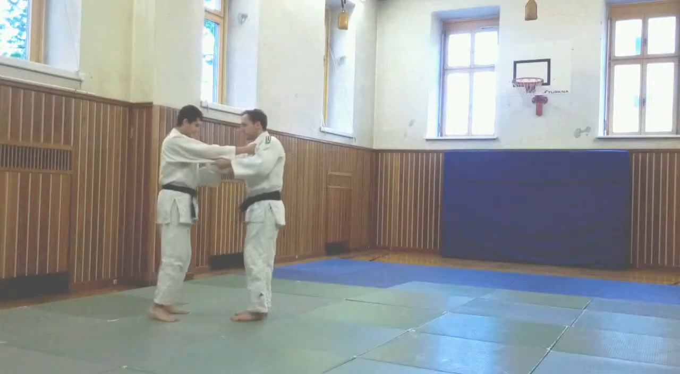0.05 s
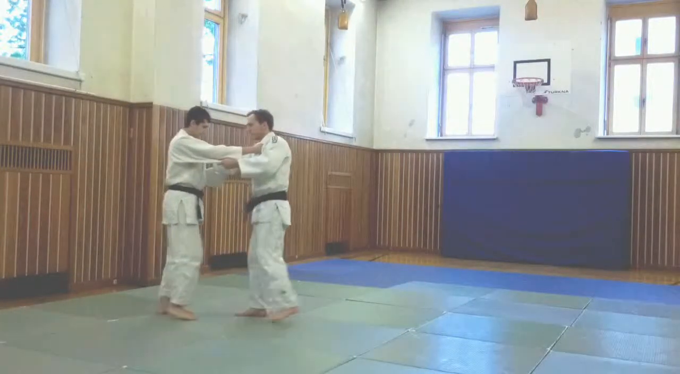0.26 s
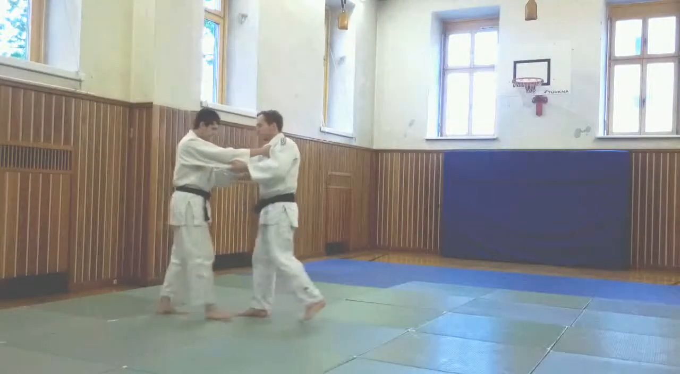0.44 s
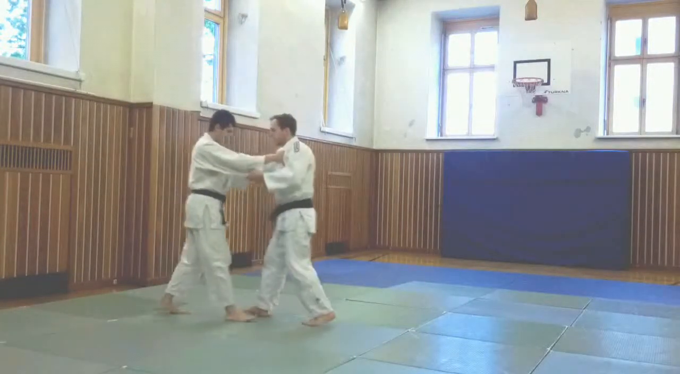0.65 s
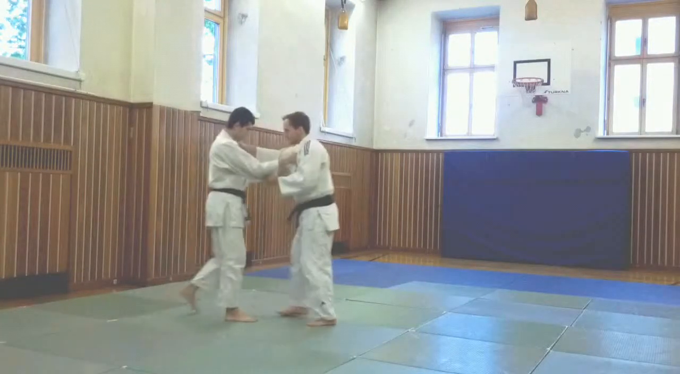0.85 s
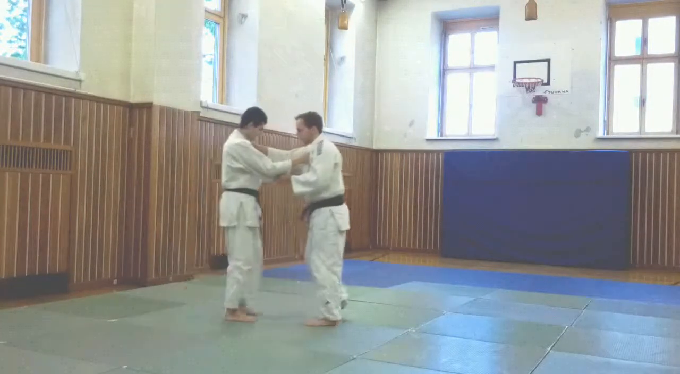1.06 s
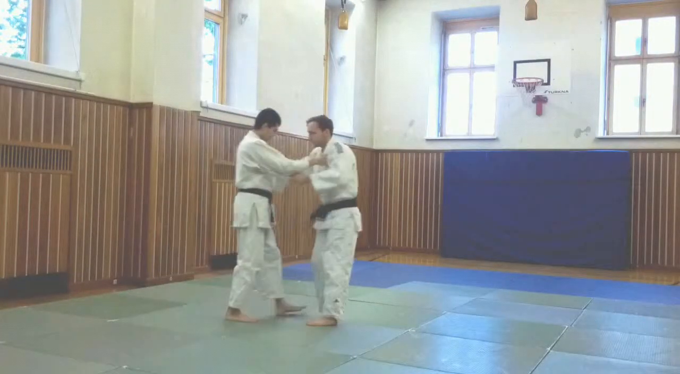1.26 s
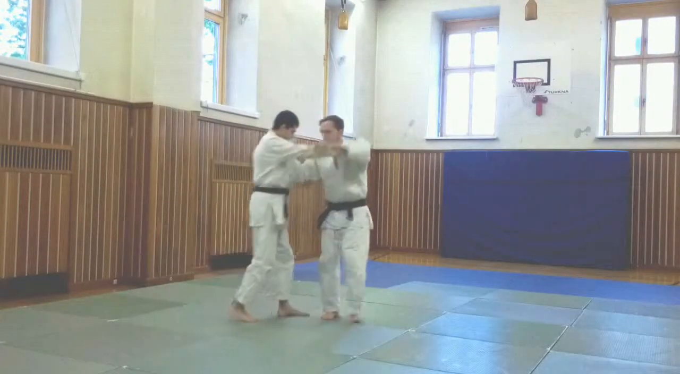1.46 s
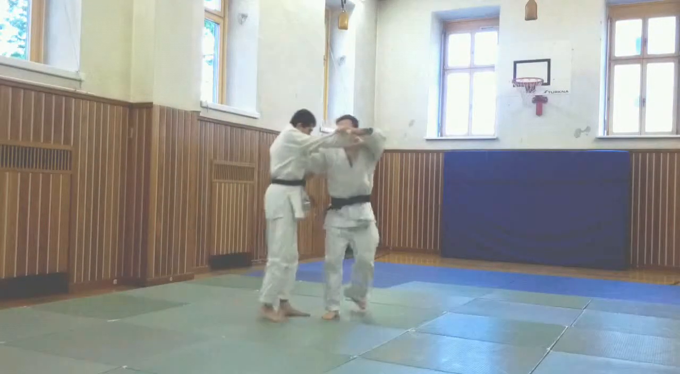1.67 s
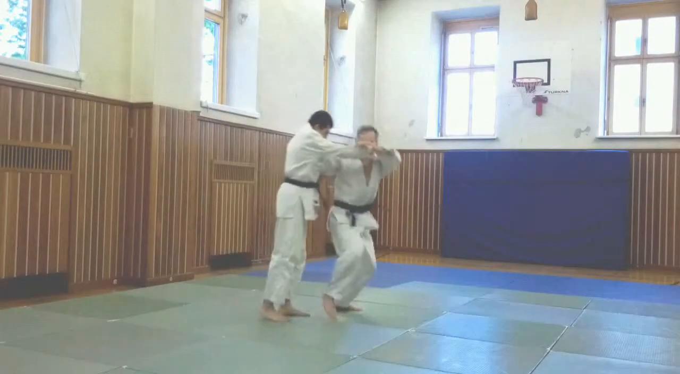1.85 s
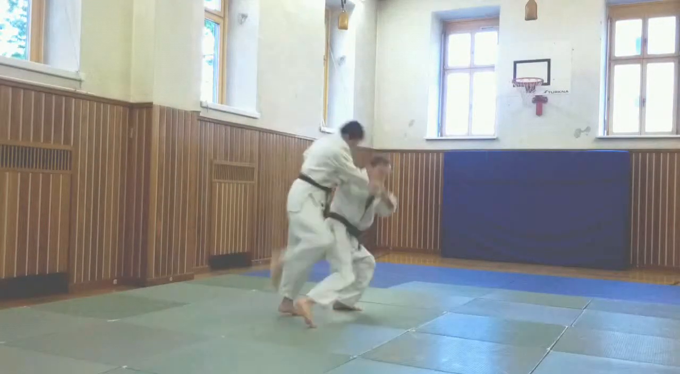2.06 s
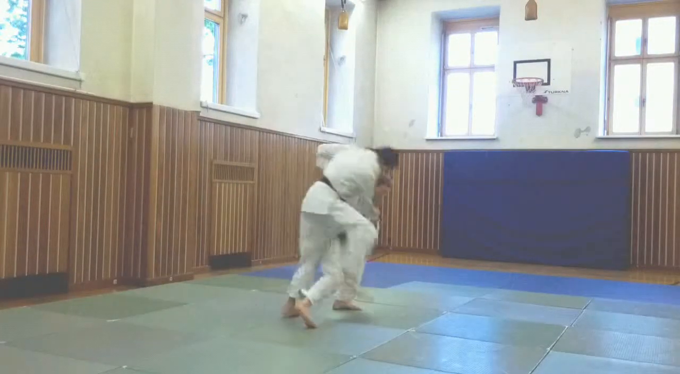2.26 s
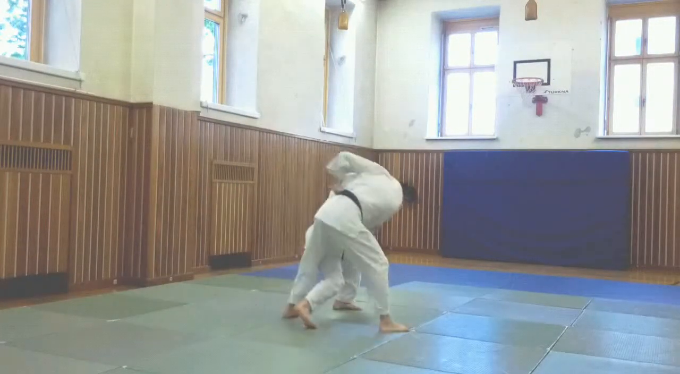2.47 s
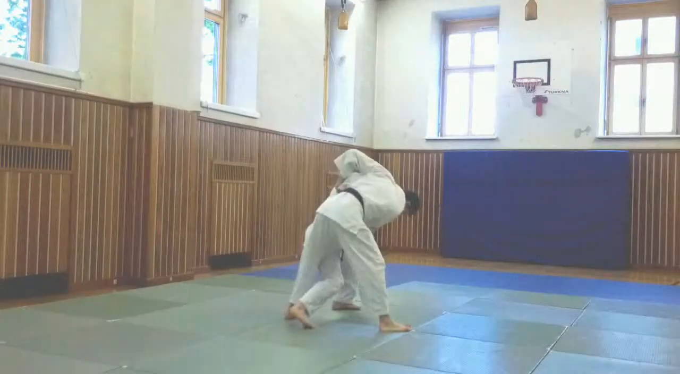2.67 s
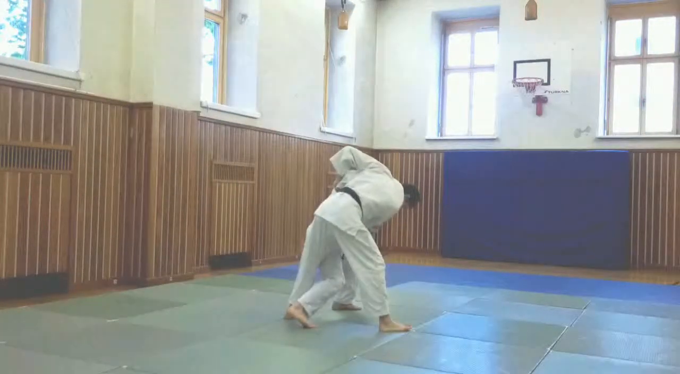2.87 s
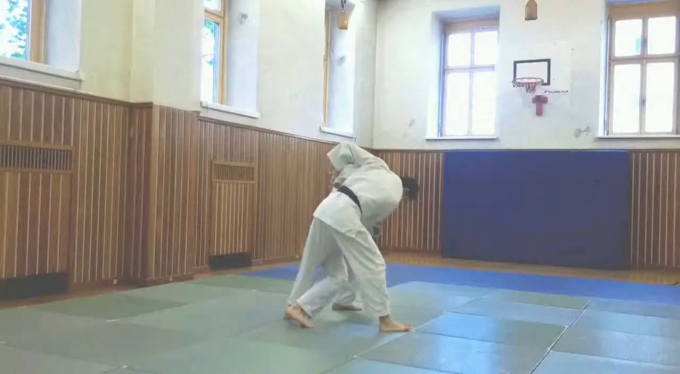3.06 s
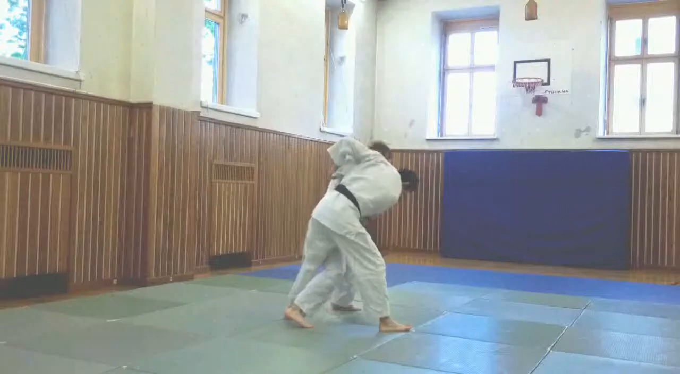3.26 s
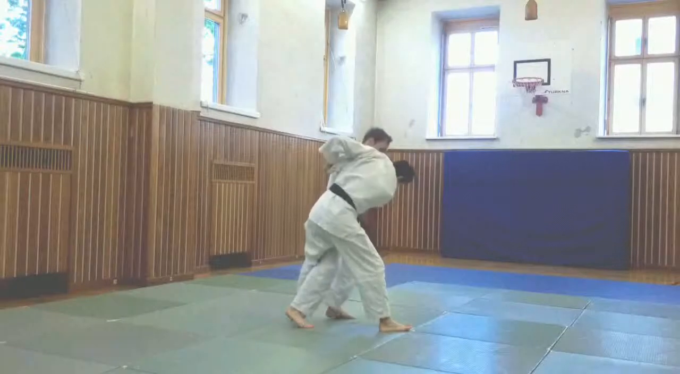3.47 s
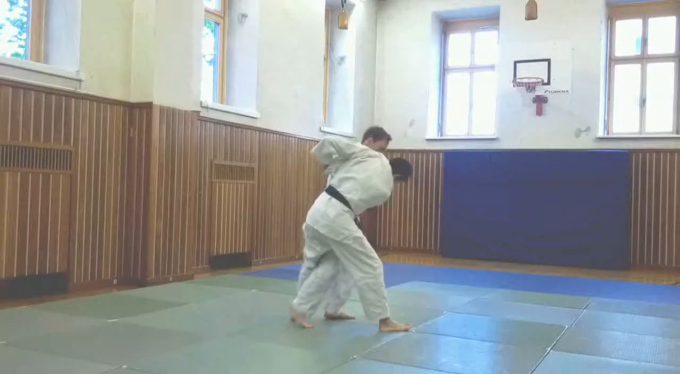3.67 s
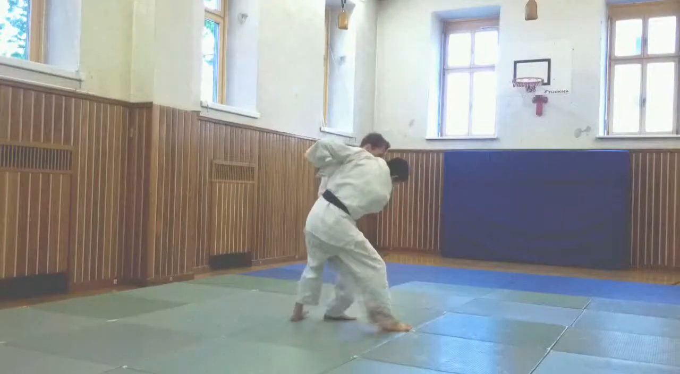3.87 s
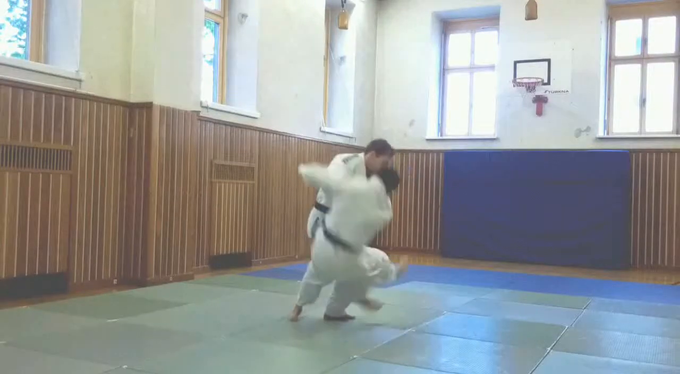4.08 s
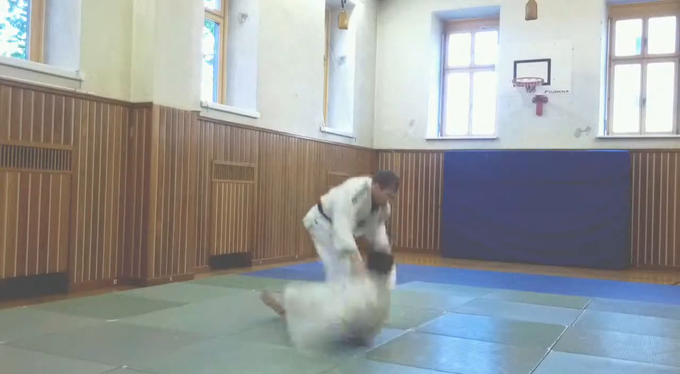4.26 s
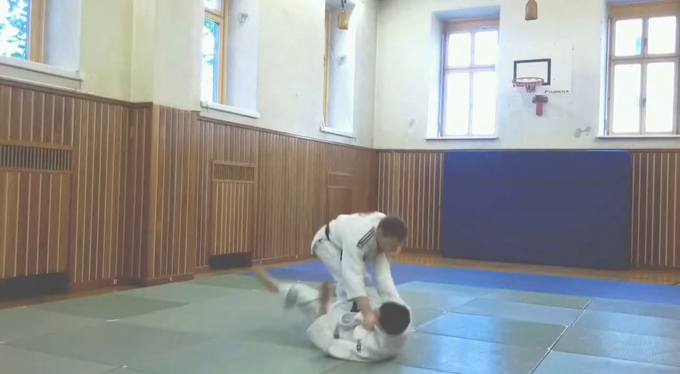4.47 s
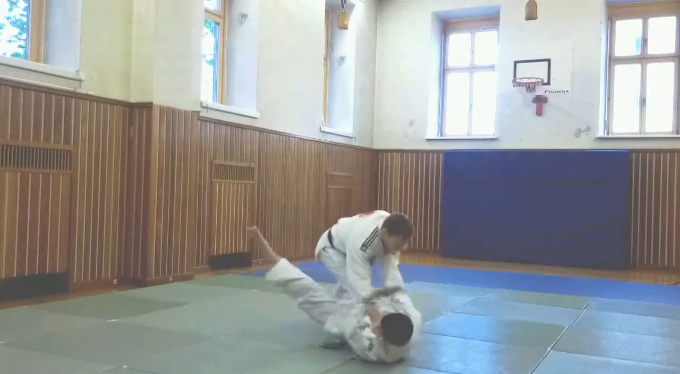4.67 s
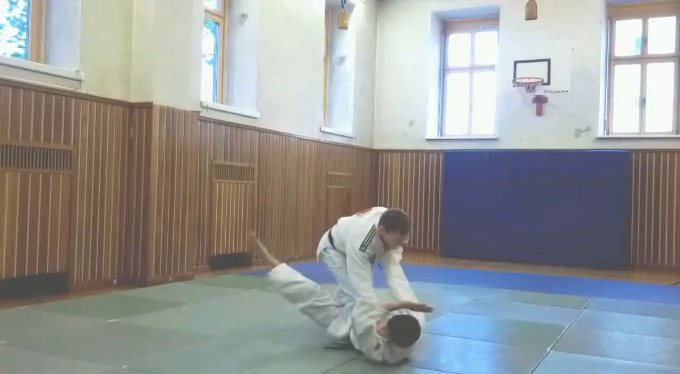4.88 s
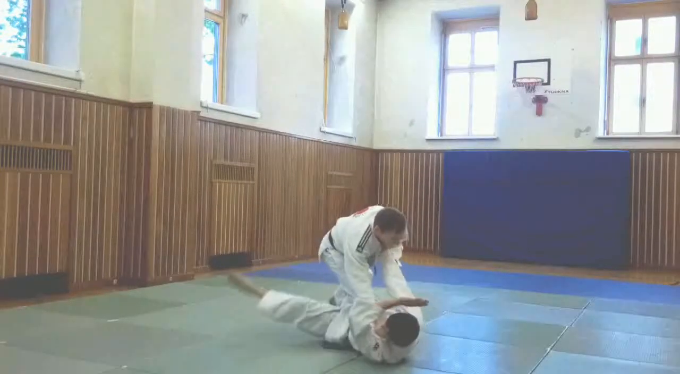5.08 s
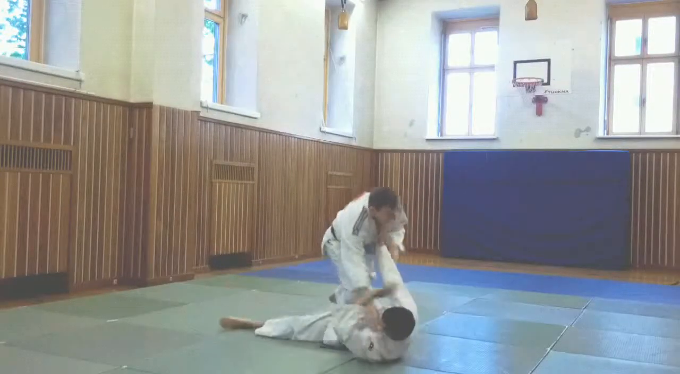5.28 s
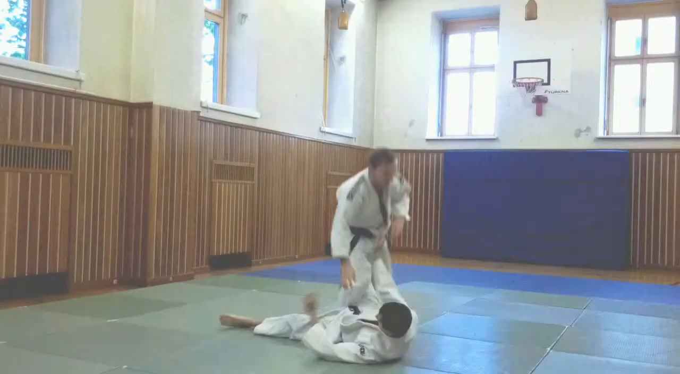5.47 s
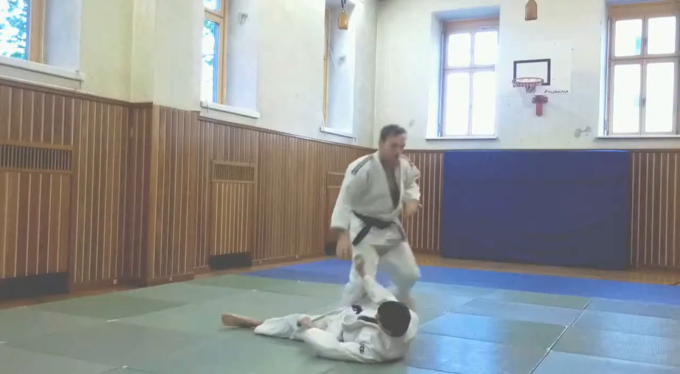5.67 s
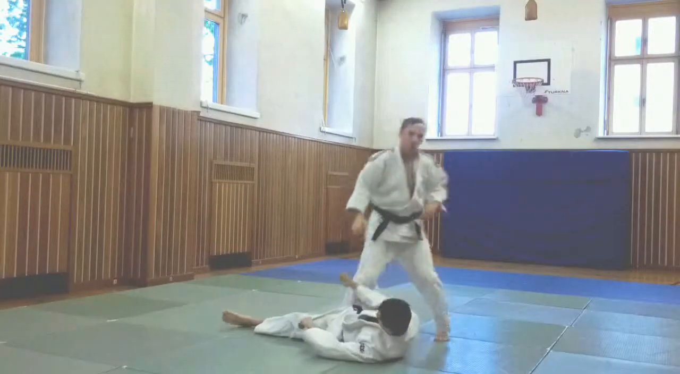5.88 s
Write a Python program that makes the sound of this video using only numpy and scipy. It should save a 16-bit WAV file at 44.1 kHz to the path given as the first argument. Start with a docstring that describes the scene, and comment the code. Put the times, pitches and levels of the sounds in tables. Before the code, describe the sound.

Bare feet slide softly on vinyl mats, a dull thump rings the hall, then one huge clipped body slam cracks and echoes away.

```python
"""A judo throw in a tall gym

Two barefoot judoka shuffle over padded mats; one stamps in, sweeps and throws the other. Each blow is a short
pulse mixing a skin-and-cloth slap, a dull thud and a knock, with ringing boards of the sprung floor underneath;
one faint tick is made the same way. Feet slide around the blows as swelling filtered noise. The panelled hall
answers after a short gap and rings on, its high treble dying first. The landing overloads the microphone."""
import sys
import numpy as np
from scipy import signal
from scipy.fft import rfft, irfft, next_fast_len
from scipy.io import wavfile
from scipy.ndimage import uniform_filter1d

SR = 44100
rng = np.random.default_rng(int(sys.argv[2]) if len(sys.argv) > 2 else 0)


def unload_audio(sound):
    """Save the sound as a 16-bit wav file, at the path given as the first command line argument."""
    columns = np.transpose(np.atleast_2d(sound))
    # keep every value between -1 and 1, then stretch to whole-number steps
    steps = np.round(np.clip(columns, -1, 1) * 32767)
    wavfile.write(sys.argv[1], SR, steps.astype(np.int16))


N = 261513   # length in samples


def from_db(db):
    """Turn decibels into a plain multiplier."""
    return 10 ** (np.asarray(db) / 20)


def rms_one(x):
    """Scale to an rms (average strength) of one."""
    return x / np.sqrt(np.mean(x ** 2) + 1e-20)


def at_hz(points, hz):
    """Read a table between its rows, with frequency spaced as in musical pitch (logarithmic)."""
    table_hz, values = np.array(points).T
    return np.interp(np.log(hz), np.log(table_hz), values)


def colour(x, spectrum):
    """Filter noise to the shape of a spectrum while keeping its overall strength."""
    size = next_fast_len(len(x))
    hz = np.arange(size // 2 + 1) * SR / size + 1   # + 1 avoids the logarithm of zero
    gain = rms_one(from_db(at_hz(spectrum, hz)))
    return irfft(rfft(x, size) * gain, size)[:len(x)]


def causal(gain):
    """Make the most compact pulse with this spectrum that starts at once (folded cepstrum)."""
    cepstrum = irfft(np.log(gain))
    cepstrum[1:len(gain) - 1] *= 2
    cepstrum[len(gain):] = 0
    return irfft(np.exp(rfft(cepstrum)))


def flutter(per_s, depth_db):
    """Random loudness wobble: random steps averaged over 1 / per_s seconds."""
    knots_per_s = 400
    knots = rng.standard_normal(int(N / SR * knots_per_s) + 2)
    smooth = rms_one(uniform_filter1d(knots, max(1, round(knots_per_s / per_s))))
    wobble = np.interp(np.arange(N) / SR * knots_per_s, np.arange(len(knots)), smooth)
    return from_db(depth_db * wobble)


def burst(decay_ms, push=0.19):
    """A short dying puff of noise riding on a one-way push of air, with unit energy."""
    ms = np.arange(SR // 50) * 1000 / SR
    puff = (push + rng.standard_normal(SR // 50)) * np.exp(-ms / max(decay_ms, .1))
    return puff / np.sqrt(np.sum(puff ** 2))


# colour of the hall rumble and microphone hiss: (f/Hz, relative level/dB)
AIR_COLOUR = [(12, -40.5), (20, 5), (53, 0.5), (166, -11.5), (352, -26), (534, -16.5), (811, -31),
              (1410, -15.5), (1670, -18.5), (6720, -30.5), (9930, -32.5), (13100, -24.5), (15500, -21)]
AIR_DB = -59


def steady_air():
    """Hall rumble and microphone hiss: unchanging filtered noise."""
    return from_db(AIR_DB) * colour(rng.standard_normal(N), AIR_COLOUR)


# the pair's rustle under the slides, swelling and sinking:
# (t/s, hiss level/dB, shuffle level/dB, rumble level/dB)
RUSTLE_LEVELS = [(0.0, -70, -66, -66), (0.15, -61, -73.5, -67), (0.8, -54.5, -70.5, -60),
                 (1.5, -57.5, -62.5, -61.5), (1.85, -63, -60.5, -52.5), (2.35, -58.5, -57.5, -48),
                 (2.6, -74, -75, -67), (3.2, -66, -70, -62.5), (3.549, -69.5, -62.5, -63),
                 (3.83, -65, -57.5, -49), (4.099, -54, -56, -52), (4.401, -80, -77, -66.5),
                 (5.55, -75, -63.5, -56.5), (5.93, -70, -75, -52)]
RUMBLE_WOBBLE_DB = 4


def rustle():
    """The pair's rustle swells and sinks as hiss, shuffle and a wobbling floor rumble; returns gains."""
    t = np.arange(N) / SR
    s, hiss_db, shuffle_db, rumble_db = np.transpose(RUSTLE_LEVELS)
    hiss = from_db(np.interp(t, s, hiss_db))
    rub = np.zeros(N)
    shuffle = from_db(np.interp(t, s, shuffle_db))
    rumble = from_db(np.interp(t, s, rumble_db)) * flutter(12, depth_db=RUMBLE_WOBBLE_DB)
    return np.array([hiss, rub, shuffle, rumble])


# feet sliding and jackets rubbing:
# (fastest moment t/s, rise t/s, fall t/s, hiss level/dB, rub level/dB, shuffle level/dB, rumble level/dB)
SLIDE_STROKES = [(0.05, 0.024, 0.069, -54, -73, -67, -54), (0.44, 0.14, 0.12, -46, -61, -77, -63),
                 (0.64, .02, 0.11, -63, -59, -58.5, -70), (0.93, 0.072, 0.21, -53, -52.5, -63, -64),
                 (1.11, 0.17, 0.22, -41.5, -51, -85, -64), (1.36, 0.13, 0.26, -55.5, -63, -58.5, -50.5),
                 (1.61, 0.069, 0.21, -41, -49, -63.5, -65), (1.99, 0.091, 0.24, -63, -66, -55.5, -42.5),
                 (2.2, 0.17, 0.2, -69, -63, -61, -64), (3.314, 0.084, 0.073, -43.5, -52, -54, -50.5),
                 (3.405, 0.12, 0.12, -48.5, -54, -55, -51), (3.712, 0.023, 0.063, -54, -60.5, -63, -51),
                 (3.9, 0.048, .1, -43.5, -50, -52.5, -47.5), (4.21, 0.097, 0.084, -52, -56, -48, -51.5),
                 (4.29, 0.064, 0.062, -57, -42.5, -40, -35.5),
                 (5.225, 0.026, 0.17, -49, -53.5, -38.5, -41.5), (5.364, 0.046, 0.4, -74, -71, -54, -42.5),
                 (5.843, .012, 0.019, -45.5, -64, -62, -56), (5.93, 0.069, 0.055, -65, -62, -53, -60)]
# colour of skin hissing on vinyl: (f/Hz, relative level/dB)
HISS_COLOUR = [(1760, -28.5), (3000, -5.5), (4290, -3.5), (6170, -1), (6990, -2), (13600, 2), (15500, 2.5)]
# colour of skin rubbing on vinyl: (f/Hz, relative level/dB)
RUB_COLOUR = [(800, -24), (1400, -10), (1800, -6), (2120, 0), (2500, -6), (3300, -6), (5000, -15)]
# colour of cloth and mat foam shuffling: (f/Hz, relative level/dB)
SHUFFLE_COLOUR = [(100, -9.5), (200, 3), (450, 6.5), (800, 0), (1400, -4.5), (2500, -34)]
# colour of the floor rumbling under the weight: (f/Hz, relative level/dB)
RUMBLE_COLOUR = [(15, -10), (28, 16.5), (42, 8), (70, 4), (120, -14.5), (200, -35)]
# a slide climbs about this much in its rise time and loses it in its fall time; its peak is rounded off
SLIDE_SWING_DB, SLIDE_ROUNDING = 21, .2   # rounding as a share of the rise or fall time


def slides():
    """Skin on vinyl hisses and rubs near 2 kHz, cloth and foam shuffle below, the floor rumbles under the weight."""
    t = np.arange(N) / SR
    gains = rustle()
    for peak_s, rise_s, fall_s, *levels_db in SLIDE_STROKES:
        away = np.where(t < peak_s, (peak_s - t) / rise_s, (t - peak_s) / fall_s)
        rounded = np.hypot(away, SLIDE_ROUNDING) - SLIDE_ROUNDING
        stroke = from_db(-SLIDE_SWING_DB * rounded)
        gains = np.hypot(gains, from_db(levels_db)[:, None] * stroke)   # add as powers
    rubbing = np.zeros(N)
    for gain, spectrum in zip(gains, [HISS_COLOUR, RUB_COLOUR, SHUFFLE_COLOUR, RUMBLE_COLOUR]):
        rubbing += gain * flutter(60, depth_db=1.03) * colour(rng.standard_normal(N), spectrum)
    return rubbing


# colour of the skin-and-cloth slap: (f/Hz, relative level/dB)
SLAP_COLOUR = [(1500, -11), (2100, -3), (2700, -3), (3500, 0), (4400, -1), (5400, -3.5), (7000, -2.5),
               (10000, -7), (16000, -7)]
# colour of the body of the blow: (f/Hz, relative level/dB)
BODY_COLOUR = [(300, -1), (600, 2), (850, -2), (1250, -5), (1700, -10), (2500, -13), (5000, -36.5)]
# colour of the dull thud: (f/Hz, relative level/dB)
THUD_COLOUR = [(70, -26), (140, 1), (220, -3), (350, 1.5), (500, -7.5), (900, -26)]
# colour of the floor shake: (f/Hz, relative level/dB)
SHAKE_COLOUR = [(18, -7), (35, 1.5), (60, 0), (90, 18.5), (140, 3.5), (250, -43.5)]
# colour of the sharp skin crack: (f/Hz, relative level/dB)
CRACK_COLOUR = [(3000, -26), (6000, -15), (9000, -3.5), (13000, 14.5), (16000, 15.5)]
KNOCK_WIDTH_HZ = 123


def blow_pulse(levels_db, knock_hz, knock_db):
    """Slap, body, thud, shake, crack and knock in one pulse; air trapped under the limb rings as a blow's knock."""
    hz = np.arange(4097) * SR / 8192 + 1
    spectra = [SLAP_COLOUR, BODY_COLOUR, THUD_COLOUR, SHAKE_COLOUR, CRACK_COLOUR]
    parts = [rms_one(from_db(at_hz(spectrum, hz))) for spectrum in spectra]
    parts.append(rms_one(1 / (1 + (2 * (hz - knock_hz) / KNOCK_WIDTH_HZ) ** 2)))
    power = sum((from_db(db) * part) ** 2 for db, part in zip(levels_db + [knock_db], parts))
    return causal(np.sqrt(power * SR / 200))   # 0 dB carries the energy of 5 ms of noise with rms one


def ring(age, hz, level_db, t60):
    """One struck tone: it swells within some tens of milliseconds, then falls 60 dB every t60 seconds."""
    swell = 1 - np.exp(-age / 0.023)
    return swell * from_db(level_db - 60 * age / t60) * np.sin(2 * np.pi * hz * age)


# boards of the sprung floor: (f/Hz, level against the other boards/dB, time to fall 60 dB t/s)
FLOOR_BOARDS = [(32.2, -7.5, 1.3), (40, -3, 1.7), (56.3, -12, 1.0), (81.9, -6.5, 1.68), (126.5, -2, 1),
                (159.5, -3.5, 0.55), (183.6, -3.5, 0.58), (297, -9.5, 0.62)]
BOARDS_DB, BOARD_LUCK_DB = -9, 3.37   # level against the floor shake; random spread per pulse and board


def ringing_boards(age, shake_db):
    """The floor shake sets the boards ringing, each at its own pitch and by a slightly random amount."""
    luck = rng.normal(0, BOARD_LUCK_DB, len(FLOOR_BOARDS))
    return sum(ring(age, hz, shake_db + db + BOARDS_DB + luck_db, t60)
               for (hz, db, t60), luck_db in zip(FLOOR_BOARDS, luck))


# blows on the mat and one faint tick (0.8448 s):
# (t/s, slap level/dB, body level/dB, thud level/dB, floor shake level/dB,
#  skin crack level/dB, direct path level/dB, knock f/Hz, knock level/dB)
BLOWS_AND_TICK = [(0.0435, -62, -60.5, -64, -74, -52, 0, 567, -62.5),
                  (0.7301, -51, -52, -71, -58, -47, 0.5, 450, -65),
                  (0.8448, -55.5, -72, -70, -70, -56, 10, 418, -78),
                  (1.2123, -53, -56.5, -69, -52, -50, -6, 570, -65),
                  (1.4207, -51, -56, -76, -54, -45, 1, 684, -60),
                  (1.9844, -57, -50, -46, -49, -48, 0.5, 292, -55),
                  (2.356, -19.5, -23, -24.5, -20, -32, -17, 422, -20.5),
                  (3.3841, -51.5, -71, -46, -44.5, -40, -4, 389, -54.5),
                  (3.8625, -34.5, -37, -37, -40, -38.5, -2, 693, -41),
                  (4.3019, 0, 0.5, 1, -8.5, 1.5, 20.5, 335.8, -2.5),
                  (5.211, -53, -42, -55, -30.5, -40.5, 2.5, 368, -48),
                  (5.8416, -59, -63, -52.5, -42.5, -50, 4, 310, -56)]
CONTACT_MS, SOFT_CONTACT_MS, FIRM_DB = 2.2, 5.5, -45   # pulses with a slap up to FIRM_DB land more gradually
KNOCK_RING_DB, KNOCK_T60_S = -15, 1.4   # the knock lingers in the wall panels
AIRBORNE_HZ = 210


def blows_and_tick():
    """Each is a pulse sent to the hall, smeared on its way to the microphone, and ringing boards and panels."""
    sent, direct, ringing = np.zeros((3, N + SR))
    for s, *levels_db, direct_db, knock_hz, knock_db in BLOWS_AND_TICK:
        at = round(s * SR)
        pulse = blow_pulse(levels_db, knock_hz, knock_db)
        sent[at:at + len(pulse)] += pulse
        slap_db, shake_db = levels_db[0], levels_db[3]
        contact_ms = CONTACT_MS if slap_db > FIRM_DB else SOFT_CONTACT_MS
        smeared = signal.fftconvolve(pulse, burst(contact_ms))   # skin and cloth do not land all at once
        direct[at:at + len(smeared)] += from_db(direct_db) * smeared
        age = np.arange(N + SR - at) / SR
        ringing[at:] += ring(age, knock_hz, knock_db + KNOCK_RING_DB, KNOCK_T60_S)
        ringing[at:] += ringing_boards(age, shake_db)
    # the soft mat radiates little deep bass directly; that travels through the floor
    low_cut = signal.butter(2, AIRBORNE_HZ, "high", fs=SR, output="sos")
    airborne = signal.sosfilt(low_cut, direct)
    return sent[:N], (airborne + ringing)[:N]


# how long the hall rings at each pitch: (f/Hz, time to fall 60 dB t/s)
HALL_DECAY = [(30, 1.2), (80, 1.1), (140, 0.78), (210, 1), (340, 1.154), (550, 1.47), (1400, 1.66),
              (3800, 1.17), (7000, 0.77), (11000, 0.45), (15500, 0.16)]
# first wall echoes: (delay t/s, level/dB)
WALL_ECHOES = [(0.017, -6), (.022, -13), (.033, -9), (0.07, -14.5)]
HALL_GAP_S, HALL_BUILD_S, HALL_DB, ECHO_SPREAD_MS = 0.0094, 0.015, -12.5, 1


def hall():
    """The gym's answer: a silent gap, echoes scattered by slatted walls, and noise dying at its own rate per band."""
    t = np.arange(2 * SR) / SR
    white = rng.standard_normal((2, len(t)))
    edges = 20 * 2 ** np.arange(0, 9.7, 1 / 3)   # bands a third of an octave wide
    tail = np.zeros(len(t))
    for k, (low, high) in enumerate(zip(edges, edges[1:])):
        band_filter = signal.butter(3, [low, high], "band", fs=SR, output="sos")
        band = signal.sosfilt(band_filter, white[k % 2])   # neighbouring bands use separate noise
        t60 = at_hz(HALL_DECAY, np.sqrt(low * high))
        tail += band * from_db(-60 * t / t60)
    build = np.clip((t - HALL_GAP_S) / HALL_BUILD_S, 0, 1)
    tail = tail * from_db(HALL_DB) / np.sqrt(SR / 1000) * build
    for delay, db in WALL_ECHOES:
        echo = from_db(db) * burst(ECHO_SPREAD_MS)
        start = round(delay * SR)
        tail[start:start + len(echo)] += echo
    return tail


SLIDE_WET_DB = -11.5   # how strongly the slides and rustle feed the hall


def scene():
    """Blows, tick, slides and rustle, direct and through the hall, over the steady air."""
    sent, near = blows_and_tick()
    rubbing = slides()
    wet = signal.fftconvolve(sent + from_db(SLIDE_WET_DB) * rubbing, hall())[:N]
    return (near + rubbing + wet + steady_air())[None]


OVERLOAD, CUTOFF_HZ = .76, 15700   # highest level the input can reach; top of the treble


def record(dry):
    """The microphone input flattens loud peaks with a hard knee, and a steep filter cuts the top treble."""
    clipped = dry / (1 + np.abs(dry / OVERLOAD) ** 6.0) ** (1 / 6.0)
    top_cut = signal.ellip(12, .5, 70, CUTOFF_HZ, fs=SR, output="sos")
    return signal.sosfilt(top_cut, clipped)


dry = scene()
out = record(dry)
unload_audio(out)
```